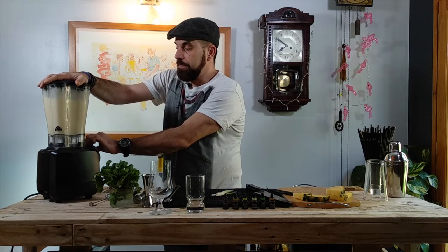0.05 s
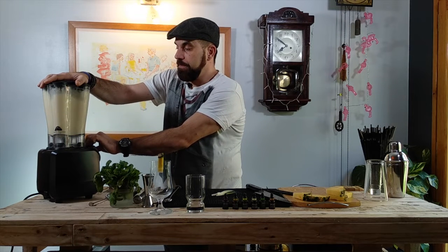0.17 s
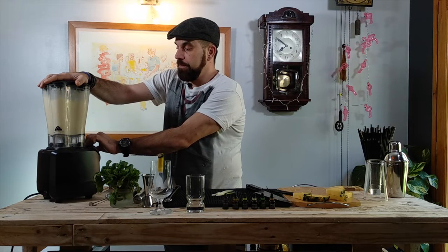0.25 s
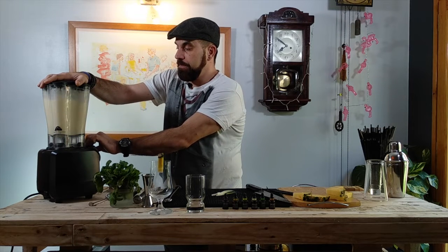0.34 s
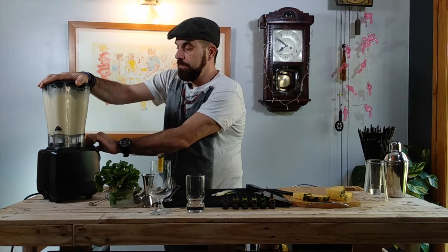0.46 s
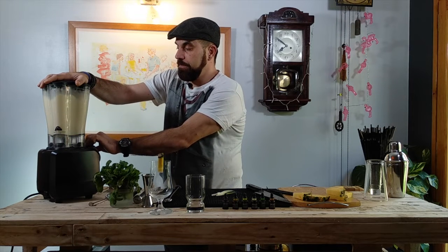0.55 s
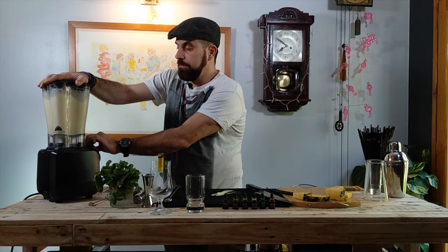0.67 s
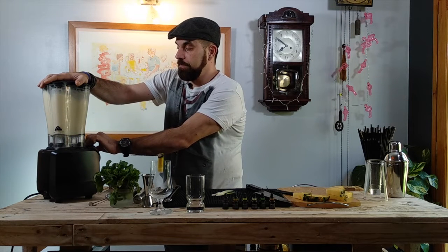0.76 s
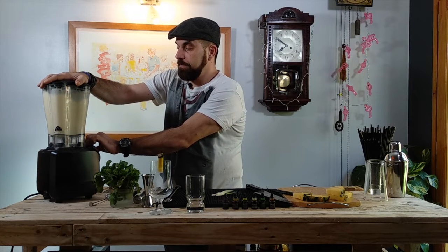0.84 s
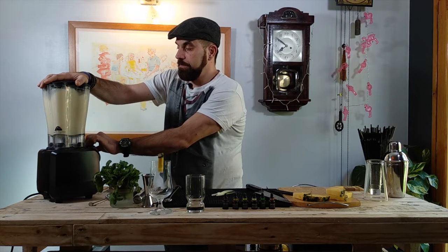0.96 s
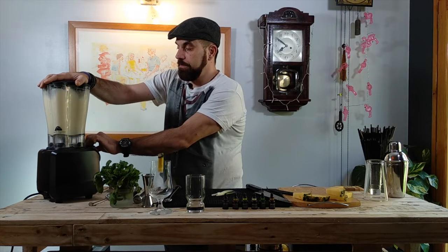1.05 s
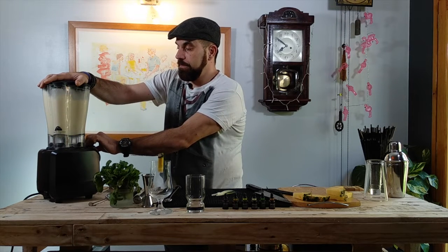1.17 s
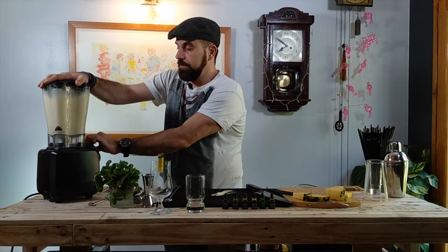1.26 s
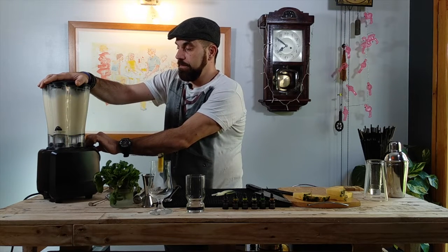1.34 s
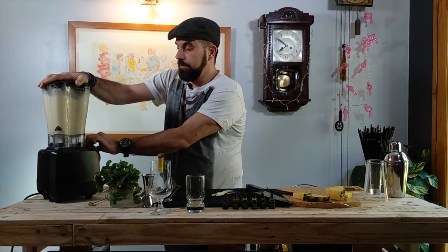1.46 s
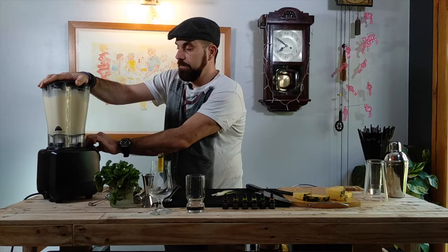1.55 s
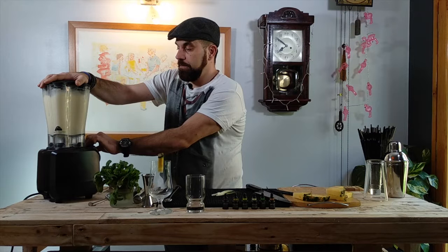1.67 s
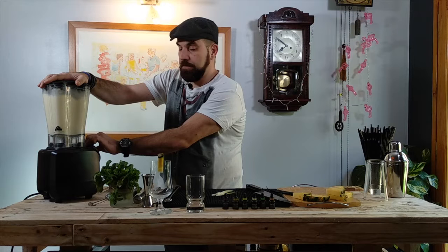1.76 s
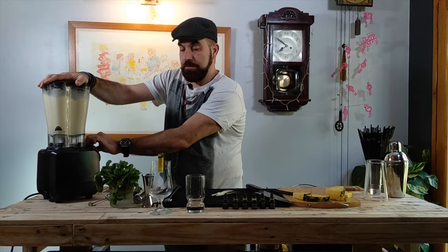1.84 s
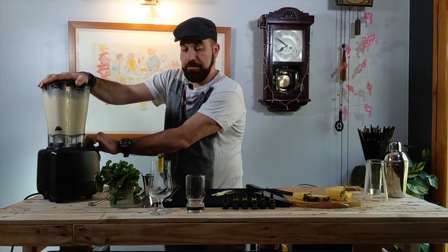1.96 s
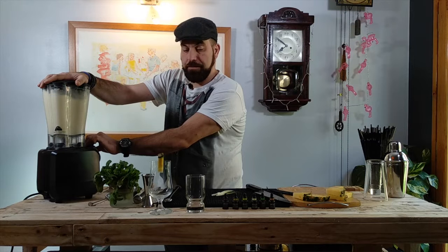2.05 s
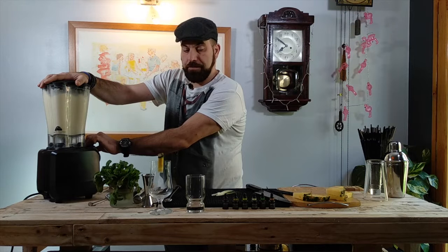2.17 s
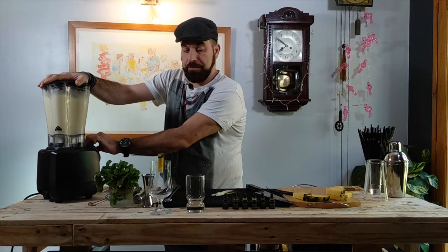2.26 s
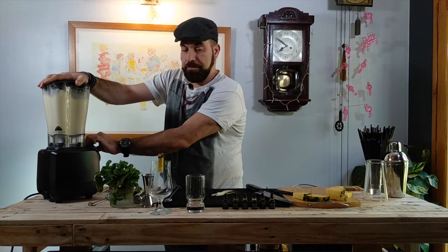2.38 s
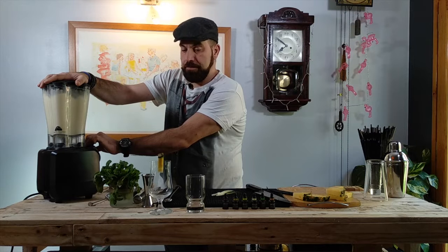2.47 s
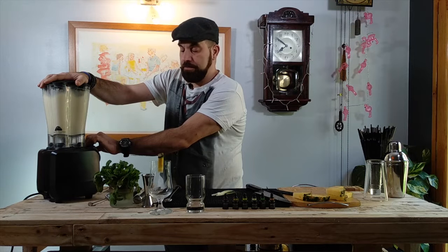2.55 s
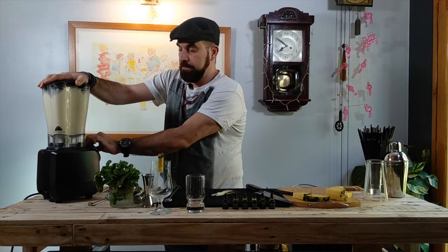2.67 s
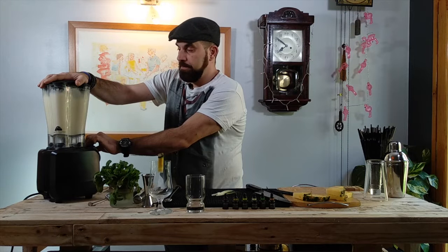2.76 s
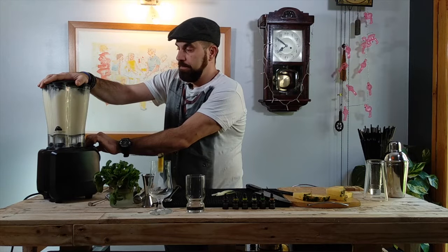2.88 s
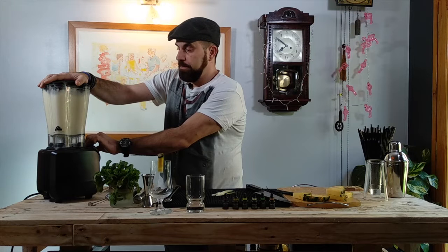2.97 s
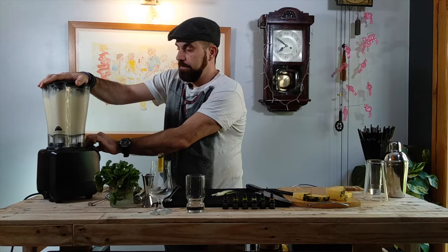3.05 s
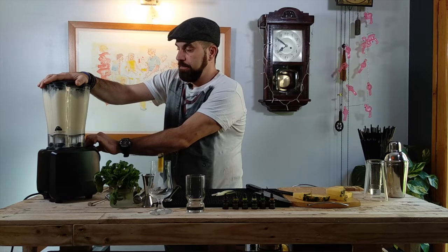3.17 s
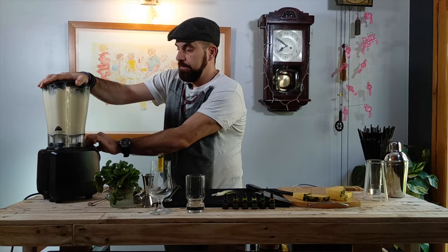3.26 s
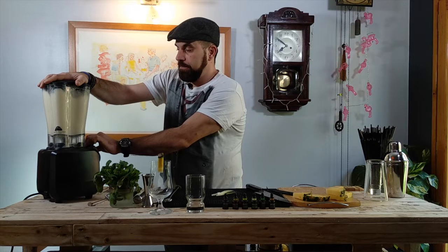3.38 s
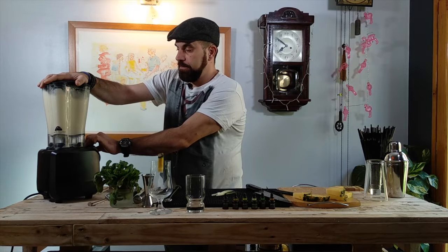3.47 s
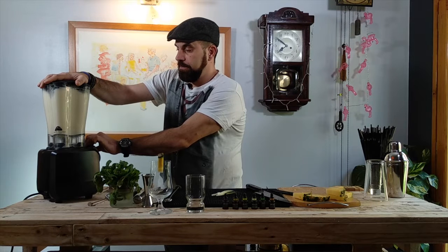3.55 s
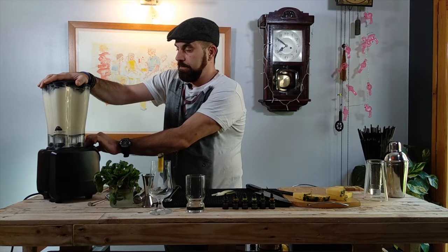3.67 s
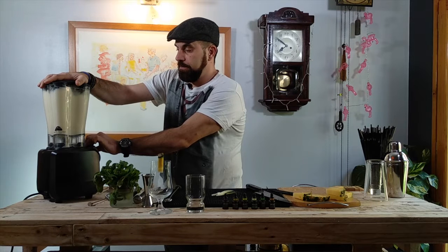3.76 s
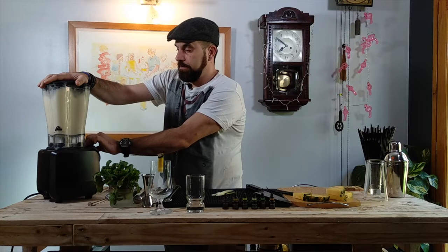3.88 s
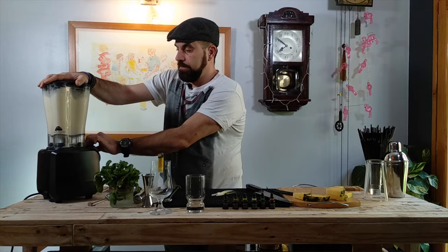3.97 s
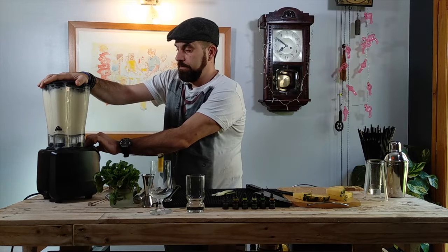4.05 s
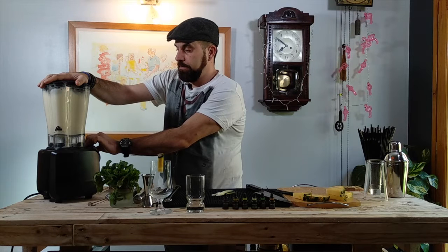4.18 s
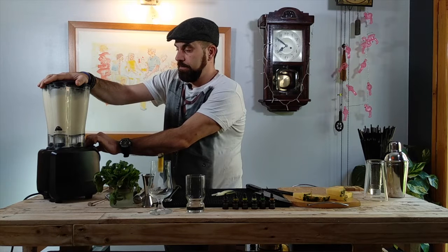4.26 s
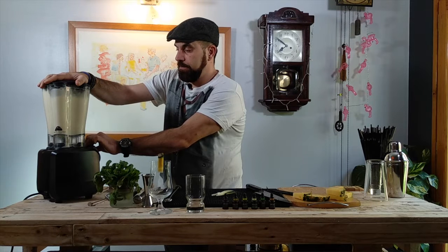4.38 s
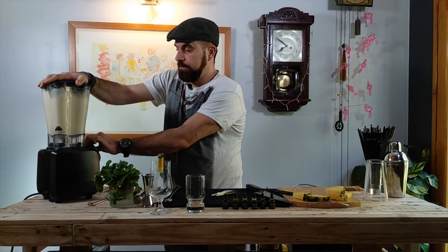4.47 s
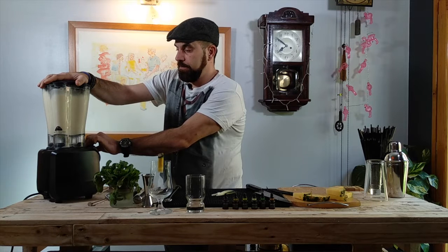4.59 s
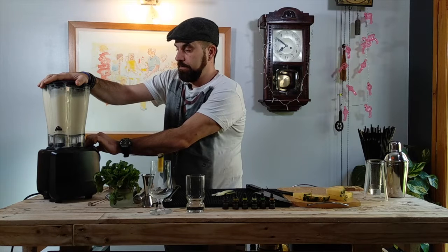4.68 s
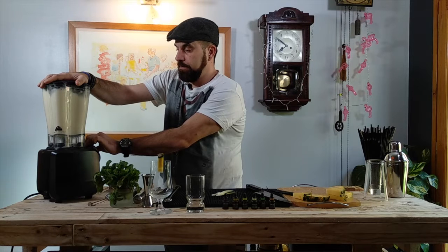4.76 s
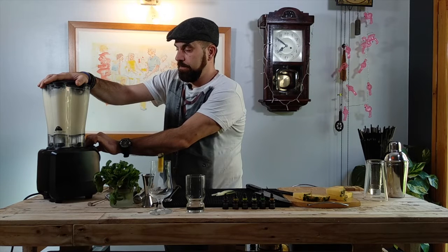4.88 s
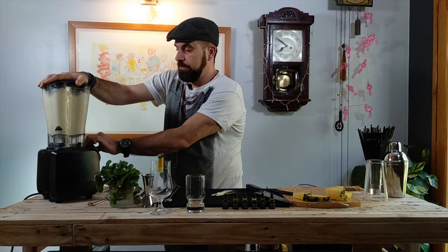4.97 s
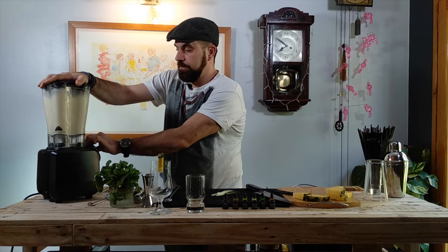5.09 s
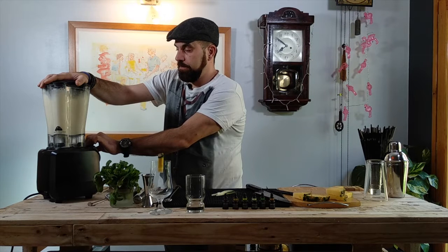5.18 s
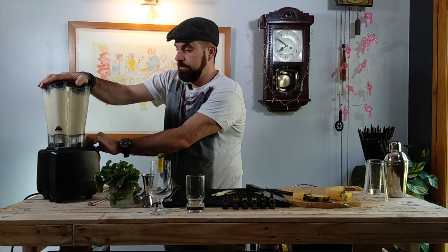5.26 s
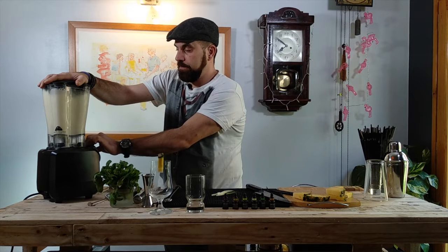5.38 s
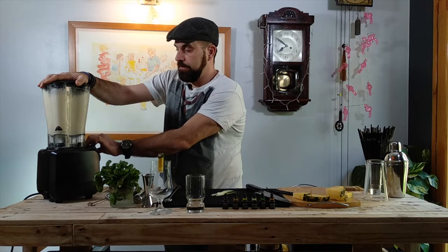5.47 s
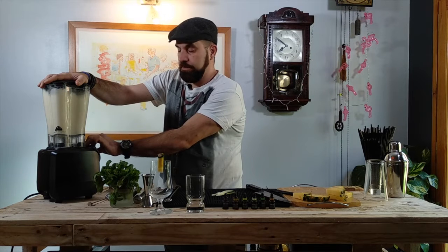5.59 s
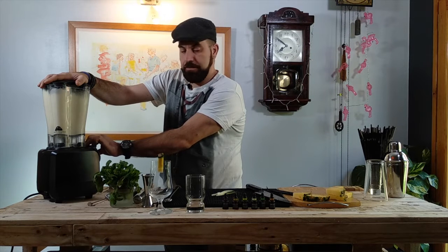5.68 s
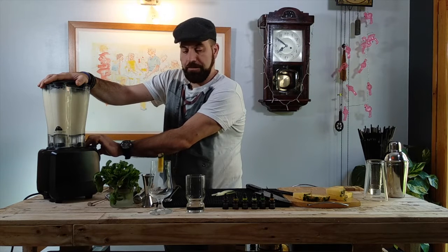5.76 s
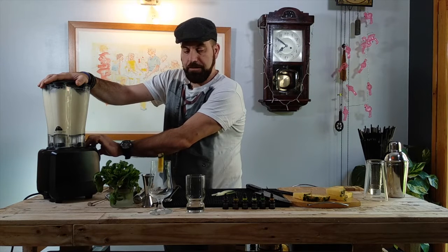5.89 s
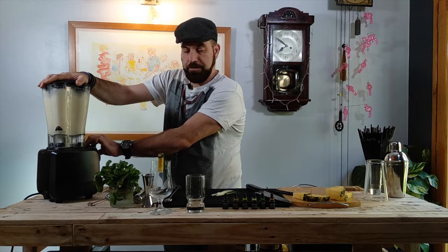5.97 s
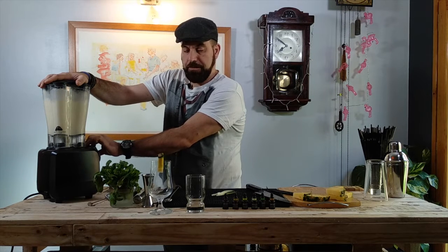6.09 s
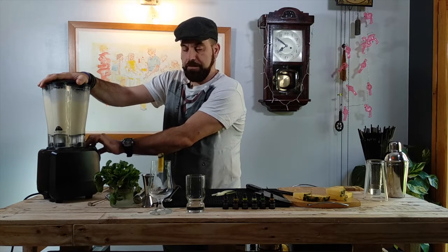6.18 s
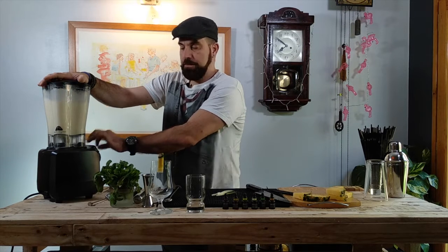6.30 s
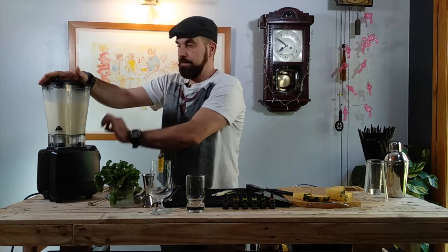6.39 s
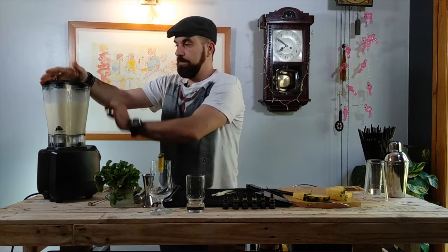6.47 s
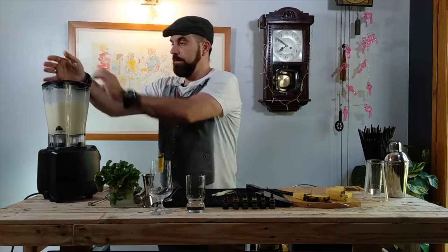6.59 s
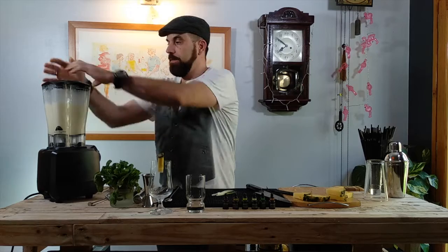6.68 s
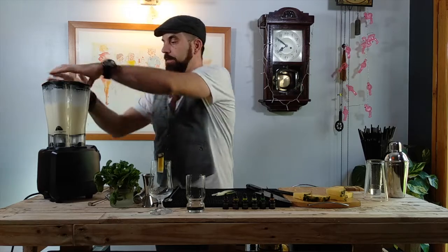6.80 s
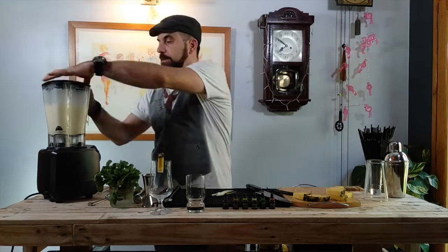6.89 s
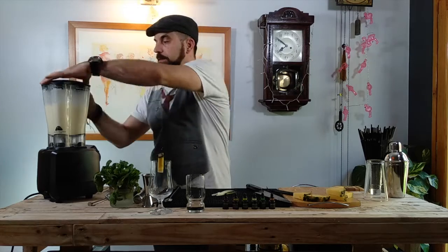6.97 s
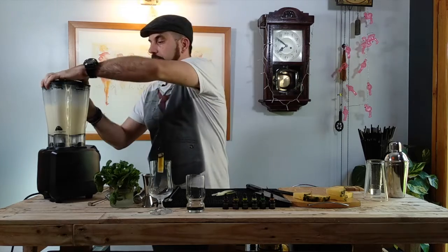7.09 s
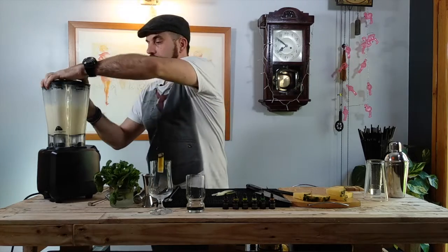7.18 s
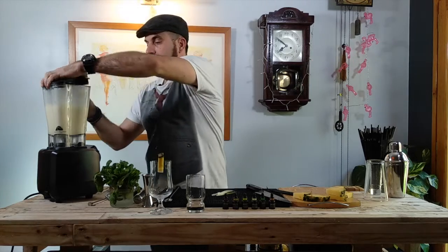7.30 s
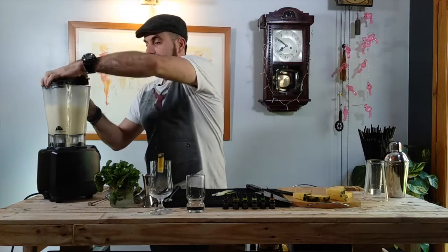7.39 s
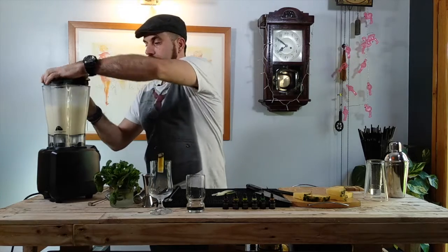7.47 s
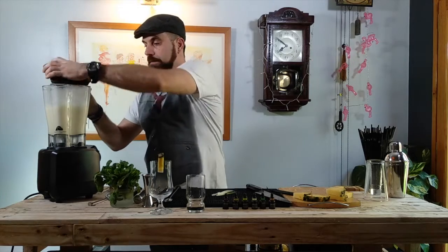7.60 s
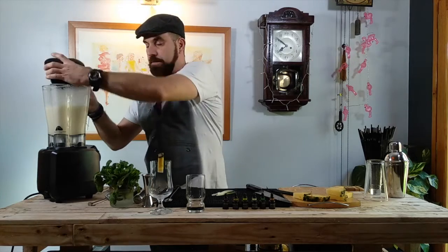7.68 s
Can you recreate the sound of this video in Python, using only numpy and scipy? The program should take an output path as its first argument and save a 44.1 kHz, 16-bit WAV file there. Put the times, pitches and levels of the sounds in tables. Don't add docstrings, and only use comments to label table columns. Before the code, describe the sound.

Loud, level blender roar with churning drink for six seconds, a quick falling run-down and slosh, then knob knock, lid thumps and a pop.

```python
import sys
import numpy as np
from scipy import signal
from scipy.fft import rfft, irfft, next_fast_len
from scipy.io import wavfile
from scipy.ndimage import uniform_filter1d

SR = 44100
rng = np.random.default_rng(int(sys.argv[2]) if len(sys.argv) > 2 else 0)


def store_pcm(level_fs):
    pcm = np.round(np.clip(level_fs, -1, 1) * 32767).astype(np.int16)
    wavfile.write(sys.argv[1], SR, np.atleast_2d(pcm).T)


def level_to_linear(level):
    exponent = np.asarray(level, float) / 20
    return 10 ** exponent


N = 341334
T = np.arange(N) / SR
SWITCH_S = 5.88
EDGE_HZ = 15850

# centre [Hz], width [Hz], lift [dB].
JUG = [(256, 59, 7.5), (330, 103, 7), (420, 30, 5), (533, 17, 4.5), (629, 23, 3), (688, 37, 5.5),
       (860, 43, -3), (1157, 26, -3), (808, 30, 6.5), (845, 16, 5), (938, 40, 8), (992, 22, 7),
       (1051, 30, 7.5), (1260, 70, 4), (1362, 26, 6), (1391, 32, 6.5), (1438, 25, 4), (1848, 69, 6.5),
       (1985, 177, 6), (3480, 45, 5), (9200, 260, 4.5)]


def evened(x):
    return x / np.sqrt(np.mean(x ** 2) + 1e-20)


def curve(rows, column=1, quiet=None):
    rows = np.asarray(rows, float)
    return np.interp(T, rows[:, 0], rows[:, column], left=quiet, right=quiet)


def shaped(x, points, peaks=()):
    size = next_fast_len(N)
    hz = np.fft.rfftfreq(size, 1 / SR)
    point_hz, point_db = np.transpose(points)
    gain_db = np.interp(np.log(hz + 1), np.log(point_hz + 1), point_db)
    for centre_hz, width_hz, lift_db in peaks:
        gain_db = gain_db + lift_db / (1 + (2 * (hz - centre_hz) / width_hz) ** 2)
    return evened(irfft(rfft(x, size) * level_to_linear(gain_db), size)[:N])


def wander(hz):
    return evened(signal.lfilter(*signal.butter(2, hz, fs=SR), rng.standard_normal(N)))


def splashes(per_s, spread_db, share):
    size_db = spread_db * np.minimum(rng.exponential(1, N), 5)
    drops = level_to_linear(size_db) * (rng.random(N) < per_s / SR)
    share = np.clip(share, 0, 1)
    hiss = rng.standard_normal(N)
    return np.sqrt(1 - share) * hiss + np.sqrt(share) * evened(drops * rng.choice([-1, 1], N))


def add(mix, s, sound):
    part = mix[round(s * SR):][:len(sound)]
    part += sound[:len(part)]


def swirl_db():
    # time [s], swirl level [dB]; the first level holds from the start.
    swirl_rows = [(6.0, -7.5), (6.22, -7), (6.29, -11.5), (6.46, -20), (6.5, -19), (6.63, -29), (6.69, -42),
                  (6.83, -46), (6.9, -62)]
    return curve(swirl_rows) - 60 * (T > swirl_rows[-1][0])


def slosh_db():
    since_s = T - SWITCH_S
    rise_db = -3 * np.exp(-np.maximum(since_s, 0) / 0.11)
    gate_db = 1500 * np.clip(since_s, -.05, 0)
    return -15.5 + rise_db + 0.75 * swirl_db() + gate_db


def hum_db():
    kick_db, kick_s = 4, 0.057
    kick = kick_db * np.exp(-((T - SWITCH_S + 0.057) / kick_s) ** 2)
    return -26.3 + 1.8 * wander(4.7) + kick


def shaft():
    # time [s], shaft speed [turns/s].
    speed_rows = [(0, 211.7), (2, 208), (4, 211), (5.86, 209.5), (5.88, 204), (5.984, 146), (6.05, 133),
                  (6.1, 113), (6.2, 110), (6.3, 88), (6.41, 72), (6.6, 52), (6.9, 19)]
    # multiple of the shaft, level under the hum [dB].
    order_rows = [(2, -12), (3, -17), (4, -24), (5, -15)]
    # frequency [Hz], level [dB].
    run_down = [(150, -22), (260, 0), (700, 0.5), (1000, -13), (1600, -31)]
    speed_hz = curve(speed_rows)
    turns = 2 * np.pi * np.cumsum(speed_hz + .5 * wander(4.84)) / SR

    def order(k):
        return level_to_linear(2.6 * wander(12)) * np.sin(k * turns + .45 * k * wander(14))

    orders = [order(k) for k, db in order_rows]
    hum = np.sin(turns) + sum(level_to_linear(db) * x for (k, db), x in zip(order_rows, orders))
    steady = (speed_hz / speed_rows[0][1]) ** 5 * hum
    falling = (sum(orders) + sum(order(k) for k in [6, 7, 8])) * level_to_linear(slosh_db())
    heard = shaped(falling, run_down, JUG) * np.std(falling)
    return np.sqrt(2) * (level_to_linear(hum_db()) * steady + level_to_linear(-12.5) * heard)


def churn(surge):
    # frequency [Hz], level [dB per Hz].
    churn_spectrum = [(130, -37), (225, -10), (357, -12.5), (419, -9.5), (487, -9.5), (681, -3),
                      (1150, -5.5), (1380, -3.5), (1710, -7.5), (1860, -10), (2390, -13.5), (4400, -23.5),
                      (5720, -46), (9680, -120)]
    level_db = -13 + swirl_db() + 0.64 * surge + .5 * wander(56)
    return shaped(splashes(3000, 3.5, 0.11), churn_spectrum, JUG) * level_to_linear(level_db)


def motor_base():
    # centre [Hz], width [Hz], level [dB].
    base_modes = [(4505, 60, -6), (4578, 30, -3), (4705, 42, 2), (4770, 70, -2), (4880, 130, -1.5),
                  (5030, 130, -3), (5190, 110, -8)]
    lumps_db, lumps_at_s, lumps_s = 7.5, 0.68, 1.1
    hz = np.fft.rfftfreq(N, 1 / SR)
    power = sum((level_to_linear(db) / (1 + (2 * (hz - c) / width) ** 2)) ** 2 for c, width, db in base_modes)
    level_db = -31.5 + lumps_db * np.exp(-((T - lumps_at_s) / lumps_s) ** 2)
    level_db = level_db + 0.94 * swirl_db() + 1.3 * wander(9.0) + 0.63 * wander(25)
    return evened(irfft(rfft(splashes(900, 2.0, 0.6)) * np.sqrt(power), N)) * level_to_linear(level_db)


def patchy(x):
    z = signal.stft(x, nperseg=256)[2]
    clouds = uniform_filter1d(rng.standard_normal(z.shape[::-1]), size=30, axis=0)
    clouds = uniform_filter1d(clouds, size=7, axis=1)
    return signal.istft(z * level_to_linear(1.1 * evened(clouds).T - .5), nperseg=256)[1][:N]


def spray(surge):
    # time [s], mist level [dB].
    ice_rows = [(0, -36), (.5, -34), (1.2, -37.5), (1.8, -38.5), (2.2, -49.5), (2.6, -45), (2.85, -40.5),
                (3.7, -46), (5.2, -48), (5.75, -47.5), (6.2, -50.5)]
    # frequency [Hz], level [dB per Hz].
    spray_spectrum = [(1500, -14), (4000, 2), (5500, -2.5), (6010, -6.5), (6830, -5), (8260, -8.5),
                      (9800, -11), (12000, -13.5), (16000, -21)]
    mist_spectrum = [(7000, -16), (10000, -1), (11500, -5), (13200, -4), (14600, -9), (15800, -4.5)]
    haze_spectrum = [(11000, -24.5), (13500, 0), (15800, -2)]
    # centre [s], half length [s], level [dB].
    haze_puffs = [
        (.1, .2, -55),
        (2.2, .4, -48),
        (5.85, .12, -53),
    ]
    ice_db, swirl = curve(ice_rows), swirl_db()
    gusts = level_to_linear(surge + .7 * wander(60))
    drops = splashes(600, 3.2, .15) * gusts
    fine_drops = splashes(600, 3.0, .15) * gusts
    spray_db = -29.5 + .25 * (ice_db + 45) + 0.9 * swirl + .7 * wander(8)
    coarse = shaped(drops, spray_spectrum, JUG) * level_to_linear(spray_db)
    mist = shaped(fine_drops, mist_spectrum, JUG) * level_to_linear(ice_db + swirl + 0.2 + .6 * wander(20))
    puffs = sum(level_to_linear(db) * np.exp(-((T - s) / half_s) ** 2) for s, half_s, db in haze_puffs)
    return patchy(coarse + mist + shaped(fine_drops, haze_spectrum) * puffs)


def jug_wall():
    width_hz = 16
    slaps = signal.lfilter(*signal.butter(1, width_hz / 2, fs=SR), rng.standard_normal((2, N)))
    swirl = swirl_db()
    bend = 2 * np.pi * np.cumsum(1388 + 14 * level_to_linear(swirl) * wander(2.48)) / SR
    ring = evened(slaps[0] * np.cos(bend) + slaps[1] * np.sin(bend))
    running = level_to_linear(-27 + swirl + 1.0 * wander(3))
    slopping = level_to_linear(slosh_db() + 0.49 * swirl - 3.5)
    return ring * (running + slopping)


def ticks(rows, t60_s, wide):
    out, t = np.zeros(N), np.arange(500) / SR
    for (s, db, hz), burst in zip(rows, rng.standard_normal((len(rows), 500))):
        band_hz = [hz / wide, min(hz * wide, EDGE_HZ)]
        band = signal.butter(3, band_hz, "band", fs=SR, output="sos")
        tick = signal.sosfilt(band, burst * level_to_linear(-60 * t / t60_s))
        add(out, s, level_to_linear(db) * tick / abs(tick).max())
    return out


def ice_chips():
    # time [s], peak [dB], centre [Hz].
    chips = [(0.31, -20.5, 6860), (0.379, -18.5, 5580), (0.409, -15, 5460), (0.6384, -24, 5820),
             (0.6938, -17, 5680), (0.821, -20, 6260), (0.8579, -25, 9100), (1.1197, -19, 5870),
             (1.2695, -22, 5890), (1.308, -22, 6030), (1.4102, -21, 5360), (1.1084, -27, 6460),
             (1.2196, -25, 6000), (1.5584, -15, 5600), (1.714, -21, 5750), (1.9116, -24, 7190),
             (2.1106, -24, 9530), (2.1505, -30, 9050), (2.2308, -30, 10700), (2.3231, -29, 6500),
             (2.3466, -29, 6200), (2.374, -31, 8850), (2.4159, -30, 7750), (2.511, -23, 8400),
             (2.951, -17, 9200), (2.9906, -21, 6640), (3.0295, -26, 6860), (3.1203, -27, 5530),
             (3.343, -22, 7000), (3.5508, -28, 7560), (3.9633, -16.5, 6850), (4.1619, -29, 6240),
             (4.4887, -22, 6350), (4.529, -16, 6100), (4.7411, -36, 6920), (5.4036, -32, 6710),
             (6.136, -14, 9500), (6.1943, -23, 7580), (6.2225, -17, 9400), (6.2696, -27, 7360),
             (6.348, -29, 11000), (6.278, -27, 10000), (6.403, -32, 7000)]
    sparks = [(0.0288, -17, 10900), (0.3092, -19, 13100), (0.3341, -25, 12400), (0.378, -17, 9820),
              (0.398, -17, 10200), (0.5033, -24, 10100), (0.5202, -24, 9980), (0.5546, -19, 10100),
              (0.6384, -27, 9520), (0.6769, -22, 11800), (0.7622, -26, 11100), (0.8026, -23, 10100),
              (0.821, -26, 12000), (0.8579, -20, 9850), (0.9238, -22, 10800), (1.0784, -31, 11300),
              (1.1089, -25, 9990), (1.2196, -28, 10100), (1.3069, -28, 10000), (1.4421, -24, 10400),
              (1.483, -23, 10100), (1.6147, -25, 9980), (1.713, -26, 10300), (1.9106, -28, 14700),
              (2.1101, -28, 9970), (2.1505, -24, 13300), (2.2307, -25, 10100), (2.3062, -23, 12300),
              (2.3231, -18, 9820), (2.3466, -25, 9890), (2.4159, -24, 9870), (2.5102, -25, 9890),
              (2.6639, -28, 10300), (2.9512, -24, 10000), (2.9901, -24, 9500), (3.0295, -29, 10700),
              (3.1203, -26, 12300), (3.3283, -25, 9840), (3.3548, -22, 12300), (3.9624, -28, 9920),
              (4.4882, -25, 11600), (4.5281, -26, 9530), (4.7411, -28, 10200), (5.4036, -28, 9970),
              (5.7546, -29, 10400)]
    return level_to_linear(-1.5) * ticks(chips, .009, 1.4) + level_to_linear(-4) * ticks(sparks, .007, 1.35)


def still_air():
    # frequency [Hz], level [dB per Hz].
    air_spectrum = [(30, -7), (100, 3), (300, -8.5), (700, -15), (1500, -40), (3000, -80)]
    return level_to_linear(-65) * shaped(rng.standard_normal(N), air_spectrum)


def room(x):
    t = np.arange(SR // 2) / SR
    tail = signal.lfilter([1], [1, -.6], rng.standard_normal(len(t)))
    tail = tail * level_to_linear(-60 * t / 0.29) * np.clip(t / 0.036, 0, 1) ** 2
    tail *= level_to_linear(-18) / np.linalg.norm(tail)
    tail[0] = 1
    add(tail, .0343, level_to_linear(-11) * signal.windows.hann(57) / 28)
    return signal.oaconvolve(x, tail)[:N]


def slosh():
    # frequency [Hz], level [dB per Hz].
    slosh_spectrum = [(150, -17), (240, 3.5), (340, -5.5), (460, -2.5), (600, -2.5), (800, -25),
                      (1500, -37.5)]
    return shaped(splashes(200, 2.0, 0.25), slosh_spectrum) * level_to_linear(slosh_db() - 4 + 3 * wander(20))


def knocks(rows):
    out, t = np.zeros(N), np.arange(8000) / SR
    for (s, db, hz, t60_s, rise_s), grit in zip(rows, rng.standard_normal((len(rows), 8000))):
        start = np.sin(np.pi / 2 * np.clip(t / rise_s, 0, 1)) ** 2
        band = signal.butter(2, [hz * 0.86, hz * 1.11], "band", fs=SR)
        rattle = evened(signal.lfilter(*band, grit))
        ring = np.sin(2 * np.pi * hz * t) + .28 * rattle
        add(out, s, level_to_linear(db - 60 * np.maximum(t - rise_s, 0) / t60_s) * start * ring)
    return out


def low_thumps():
    # time [s], peak [dB], pitch [Hz], t60 [s], overtones [dB].
    thumps = [(6.267, -24, 279.2, 0.041, -20), (6.506, -21, 300, .035, -18), (6.63, -38, 380, .03, -10),
              (6.569, -22, 348, 0.037, -22), (6.699, -23.5, 380, .025, -18), (6.732, -32, 420, .02, -4),
              (6.82, -35, 252, .058, -20), (7.015, -43, 260, 0.21, -20), (7.143, -31, 247, 0.15, -21),
              (7.307, -24.5, 253, 0.068, 0.5), (7.335, -21, 350, 0.024, -25), (7.37, -39, 400, .05, -12),
              (7.388, -37, 330, 0.036, -15), (7.504, -34, 470, .04, -12), (7.513, -29, 400, .025, -14),
              (7.528, -30, 400, .018, -13), (7.545, -36, 470, .07, -18), (7.59, -48, 420, .03, -11),
              (7.314, -31, 454, .04, -8), (7.429, -44, 466, .03, -8), (7.457, -41, 447, .03, -8),
              (7.729, -40.5, 300, .05, 1)]
    rows = []
    for s, db, hz, t60_s, upper_db in thumps:
        rise_s = 0.72 / hz
        rows += [(s, db, hz, t60_s, rise_s)]
        rows += [(s + .002, db + upper_db, k * hz, 0.49 * t60_s, rise_s) for k in [1.87, 2.77]]
    return knocks(rows)


def jug_taps():
    # time [s], peak [dB], t60 [s].
    taps = [
        (6.269, -6, 0.016),
        (6.472, -7.5, 0.0064),
        (6.7, -31, 0.0053),
        (7.139, -30.5, 0.06),
        (7.369, -34, 0.054),
    ]
    # mode [Hz], level [dB], share of the t60 [1].
    wall_modes = [(1407, 0, 0.95), (2370, -12, 0.35)]
    rows = []
    for s, db, t60_s in taps:
        for hz, rel_db, share in wall_modes:
            rows += [(s, db + rel_db, hz, t60_s * share, 0.038 * t60_s * share)]
    return knocks(rows)


def clicks():
    # time [s], peak [dB], centre [Hz].
    click_rows = [(6.27, -11, 900), (6.2705, -18, 2100), (6.471, -23, 1600), (6.4707, -33, 10500),
                  (6.537, -35, 3605), (6.561, -49, 12000), (6.6373, -48, 10500), (6.7206, -44, 10500),
                  (7.4905, -34, 800), (7.304, -36, 600), (6.646, -40, 3700), (6.6995, -34, 1100),
                  (6.6995, -36, 2200), (6.6995, -33, 3100), (6.6995, -40, 9600), (6.7214, -45, 4520),
                  (6.7406, -38, 8340), (7.1402, -43, 3820), (7.3108, -32, 1400), (7.307, -46, 11000),
                  (7.309, -40, 6800), (7.313, -40, 10500), (7.317, -40, 6900), (7.321, -48, 10500),
                  (7.3685, -34, 950), (7.37, -48, 2530), (7.505, -43, 6000), (7.505, -43, 12000),
                  (7.5644, -50, 3580), (7.5644, -53, 10500), (7.6839, -57, 9500), (7.733, -52, 10000),
                  (7.733, -50, 3000)]
    return ticks(click_rows, 0.013, 1.63)


def knob_stop():
    # mode [Hz], peak [dB], t60 [s].
    knob_modes = [(870, -17.5, .034), (1040, -28, .03), (4740, -36, 0.15), (4660, -33, .1)]
    return knocks([(6.471, db, hz, t60_s, .0015) for hz, db, t60_s in knob_modes])


def pressure(bright):
    # start [s], hold [s], dull rub [dB], rustle under the rub [dB].
    strokes = [(6.713, .055, -45.5, -10.5), (6.77, 0.48, -54.5, -8.5), (6.824, .005, -43.5, -13),
               (6.93, 0.011, -48, -8), (7, 0.082, -45.5, -10), (7.148, 0.011, -43.5, -6.5),
               (7.17, 0.044, -54, -10), (7.322, 0.012, -44, -14), (7.332, 0.064, -51, -4.5),
               (7.4, 0.12, -53, -9), (7.455, .02, -53, -10), (7.505, .05, -47.5, -10),
               (7.598, .13, -71, -4), (7.755, .02, -50, -5)]
    power = 0
    for s, hold_s, db, under_db in strokes:
        press_db = 450 * np.maximum(s - T, 0)
        lift_db = 280 * np.maximum(T - s - hold_s, 0)
        power = power + level_to_linear(db + bright * under_db - press_db - lift_db) ** 2
    return np.sqrt(power)


def hands():
    # frequency [Hz], level [dB per Hz].
    rub_spectrum = [(88, -43), (150, -5), (240, 0), (498, -5.5), (817, -3), (1060, -15), (1200, -6),
                    (2500, -25), (3250, -49), (5500, -120)]
    rustle_spectrum = [(1180, -23), (2000, 2.5), (4630, -3), (5600, -4), (6710, -5), (9160, -3.5),
                       (12700, -9.5), (15800, -9)]
    # centre [Hz], width [Hz], lift [dB].
    lid_modes = [(800, 65, 2), (1220, 140, -6), (2200, 170, 5), (3760, 330, 7.5), (6200, 150, 3),
                 (9200, 300, 0)]
    # start [s], length [s], from [Hz], to [Hz], level [dB].
    squeaks = [
        (7.335, .04, 6300, 7100, -64),
        (7.395, .04, 7800, 7650, -66),
        (7.44, .03, 9300, 9200, -68),
        (7.507, .03, 6600, 5800, -63),
    ]
    rub = shaped(splashes(700, 1.9, 0.23), rub_spectrum, lid_modes)
    rub = rub * pressure(0) * level_to_linear(1.5 * wander(40))
    rustle = shaped(splashes(600, 3.0, .15), rustle_spectrum, lid_modes)
    rustle = rustle * pressure(0.92) * level_to_linear(1.4 * wander(50))
    for s, length_s, from_hz, to_hz, db in squeaks:
        hz = np.linspace(from_hz, to_hz, round(length_s * SR))
        squeak = np.sin(2 * np.pi * np.cumsum(hz) / SR)
        add(rustle, s, level_to_linear(db) * signal.windows.tukey(len(hz), .5) * squeak)
    return rub + rustle


def seal_pop():
    pop_hz, length_s = 428, 0.012
    out, t = np.zeros(N), np.arange(round(length_s * SR)) / SR
    swell = np.sin(np.pi * t / length_s) ** 1.9
    tone = np.sin(2 * np.pi * pop_hz * t) + 0.11 * np.sin(2 * np.pi * 1.5 * pop_hz * t)
    add(out, 7.4895, level_to_linear(-12.5) * swell * tone)
    return out


def scene():
    # time [s], excess [dB].
    over_rows = [
        (0, 9),
        (5.87, 9),
        (6.05, 4.5),
        (6.2, .1),
    ]
    surge = wander(13.5)
    roar = churn(surge) + motor_base() + spray(surge) + jug_wall() + ice_chips() + slosh()
    blender = (shaft() + (roar + room(roar)) / 2) * level_to_linear(curve(over_rows))
    handling = low_thumps() + jug_taps() + clicks() + knob_stop() + seal_pop()
    return (blender + still_air() + room(handling) + hands())[None]


def low_pass(x):
    return signal.sosfilt(signal.butter(12, 15830, fs=SR, output="sos"), x)


def record(dry):
    cut = signal.sosfilt(signal.butter(3, 180, "high", fs=SR, output="sos"), dry)
    quick, slow = np.exp(-1 / (np.array([.004, .01]) * SR))
    power = [signal.lfilter([1 - hold], [1, -hold], cut ** 2, zi=[[.1]])[0] for hold in (quick, slow)]
    power_db = 10 * np.log10(np.maximum(.75 * power[0], power[1]) + 1e-12)
    held = cut / level_to_linear(.99 * np.maximum(power_db + 14.9, 0))
    held = signal.sosfilt(signal.butter(2, 110, "high", fs=SR, output="sos"), held)
    held = held - .7 * np.maximum(held - .44, 0) ** 2
    edge = signal.firwin(1023, EDGE_HZ, window=("kaiser", 9), fs=SR)
    return low_pass(signal.oaconvolve(held, edge[None], "same"))


dry = scene()
out = record(dry)
store_pcm(out)
```